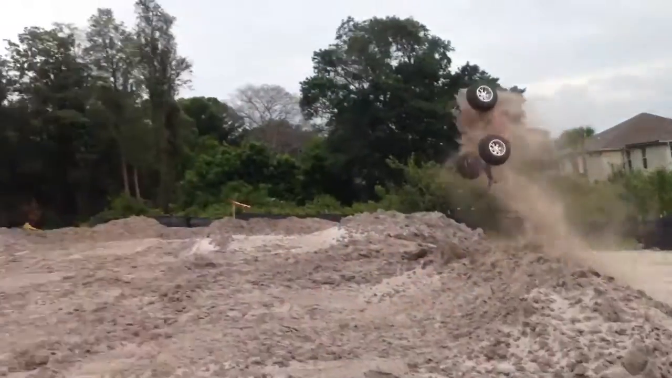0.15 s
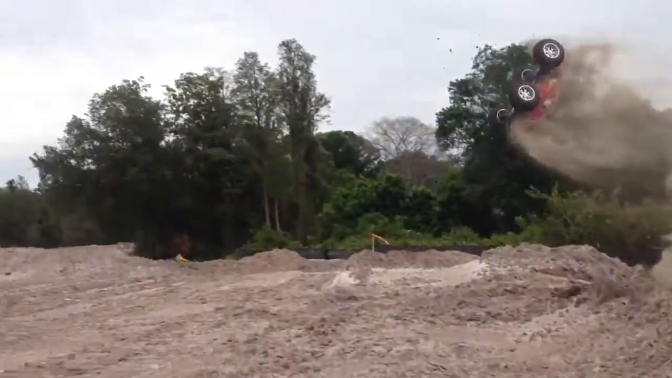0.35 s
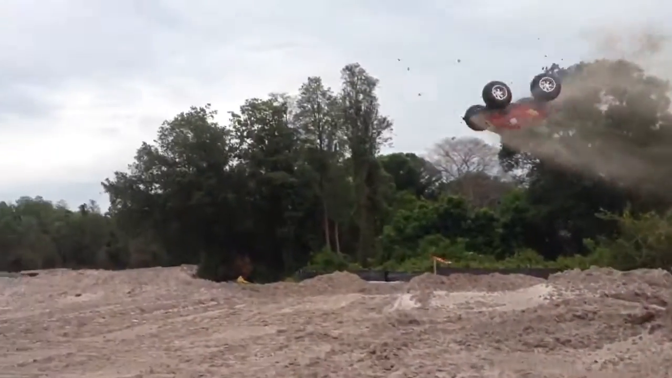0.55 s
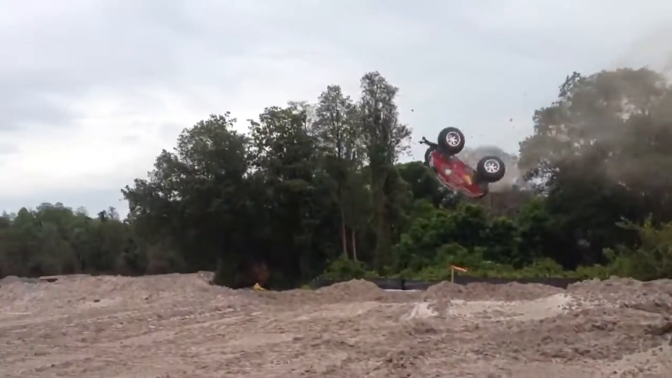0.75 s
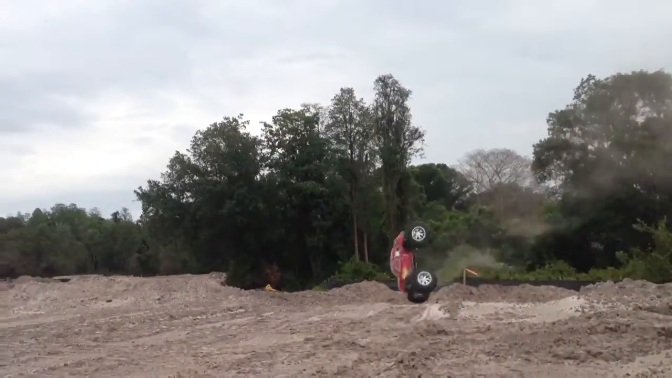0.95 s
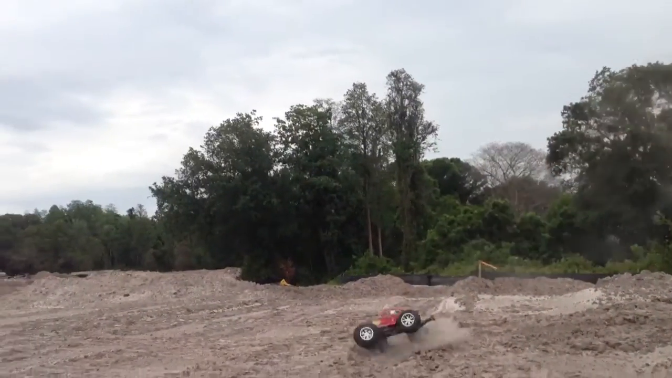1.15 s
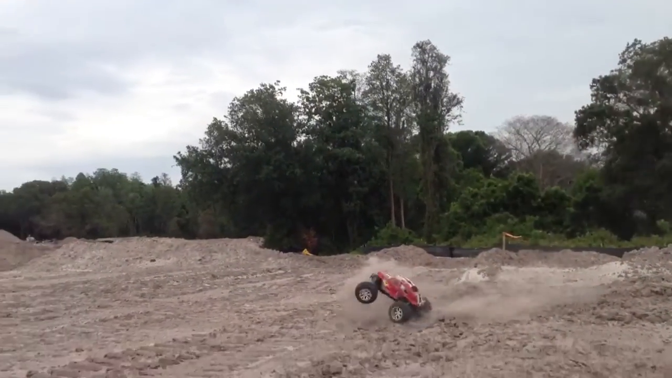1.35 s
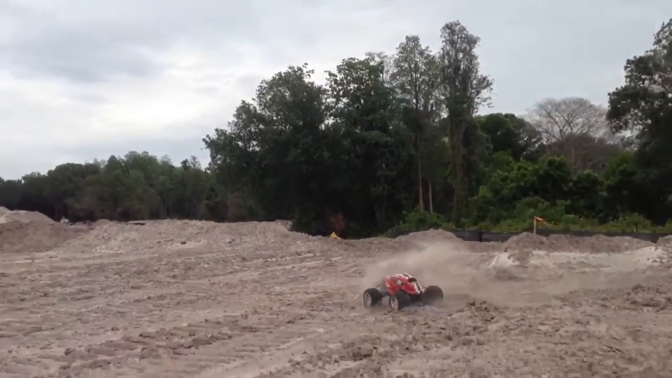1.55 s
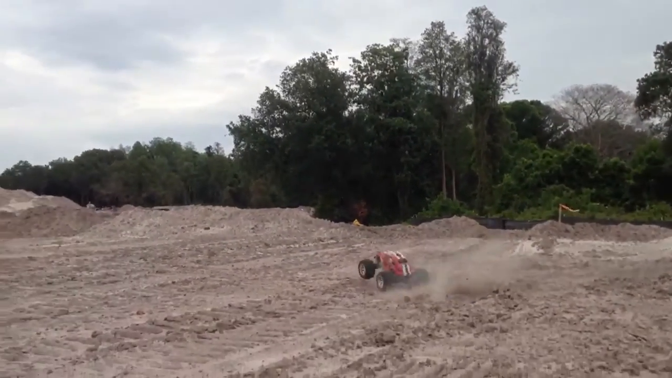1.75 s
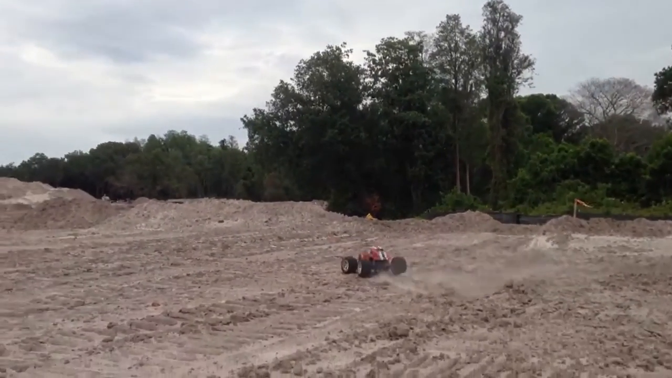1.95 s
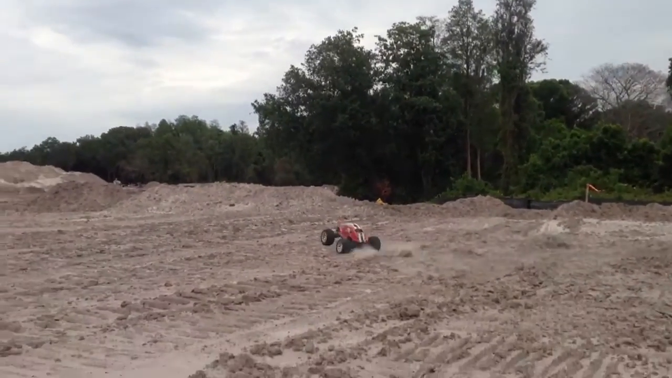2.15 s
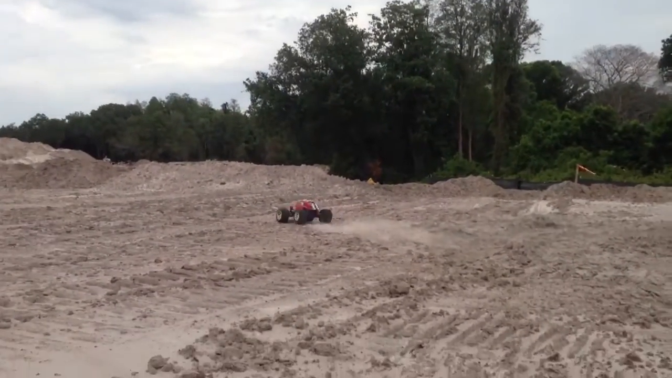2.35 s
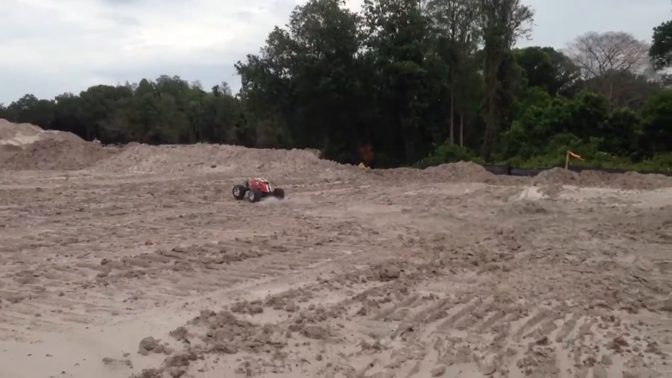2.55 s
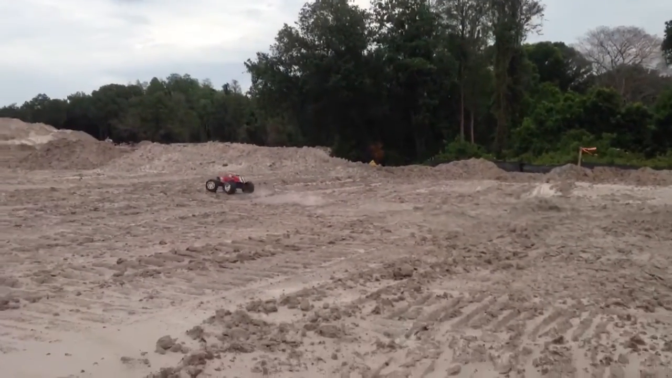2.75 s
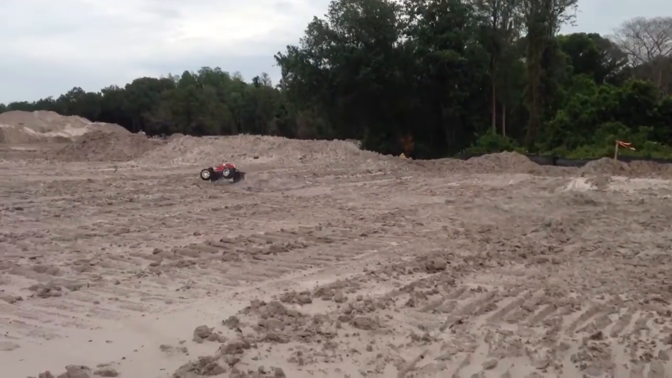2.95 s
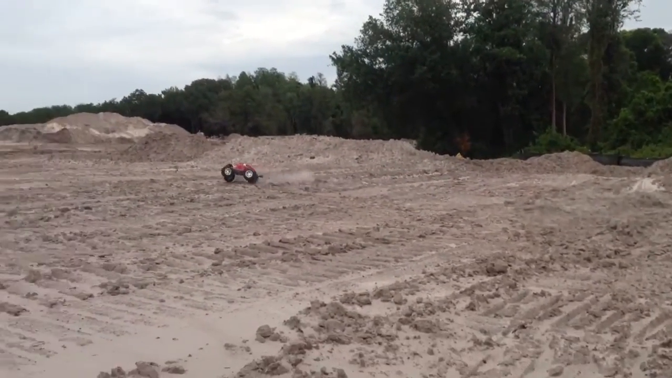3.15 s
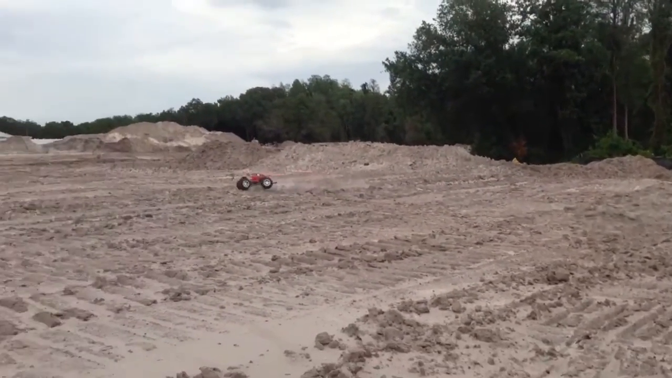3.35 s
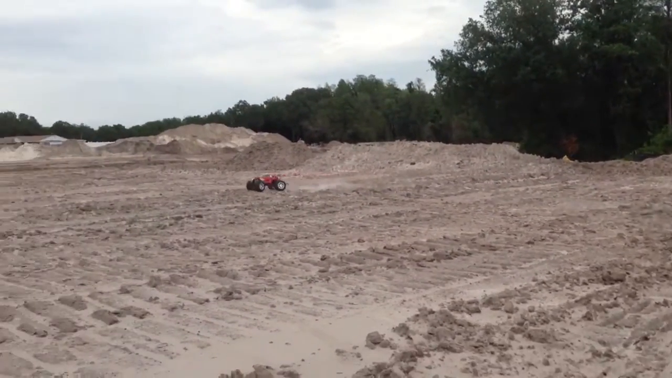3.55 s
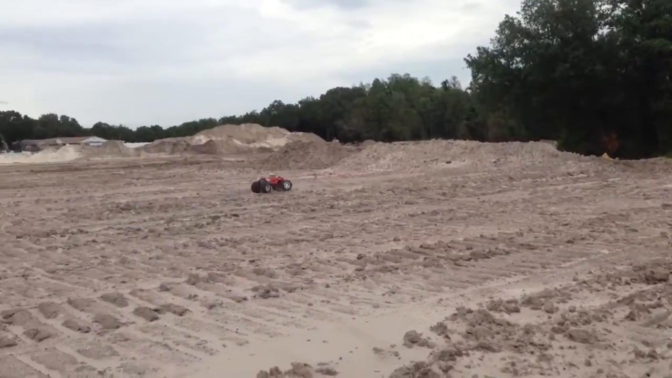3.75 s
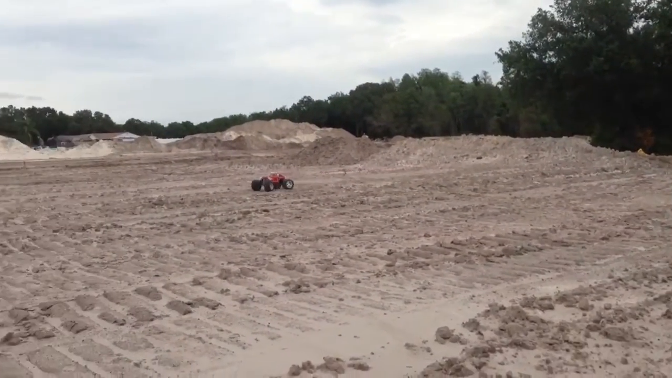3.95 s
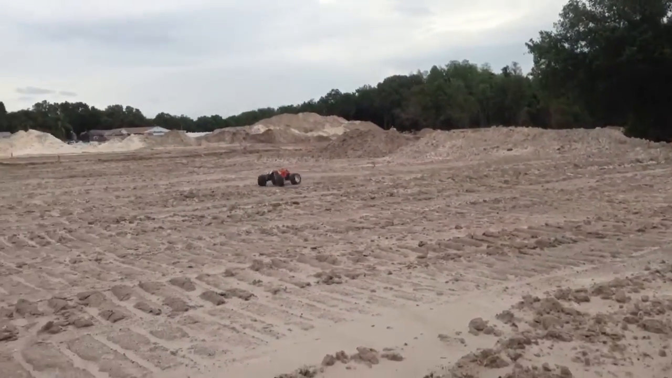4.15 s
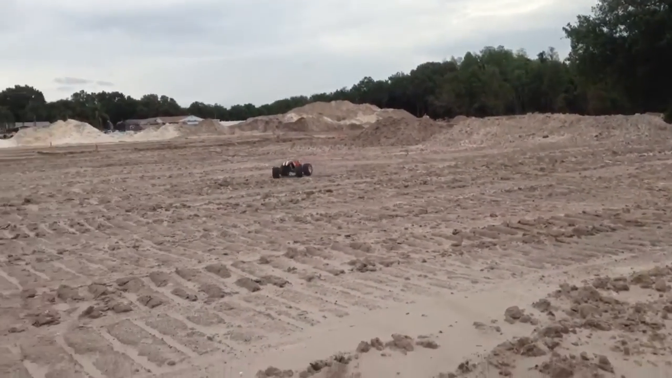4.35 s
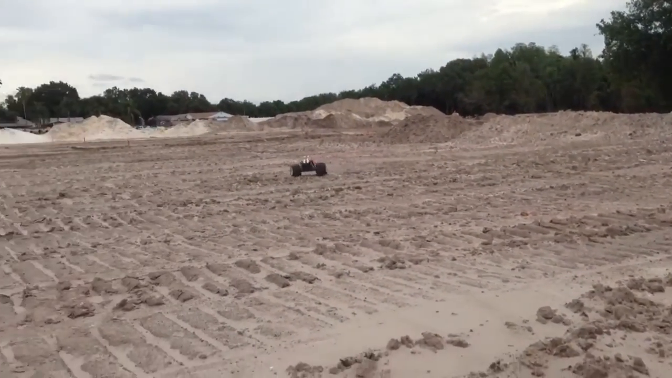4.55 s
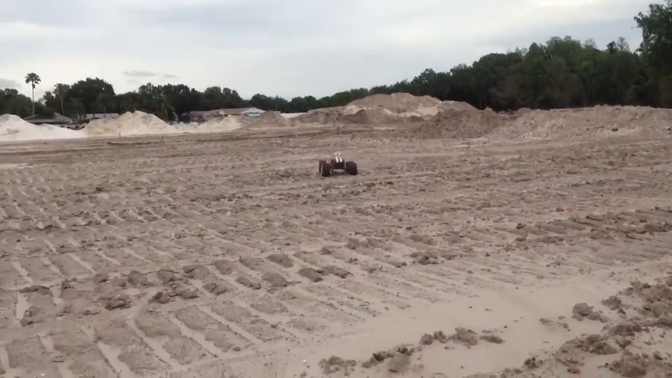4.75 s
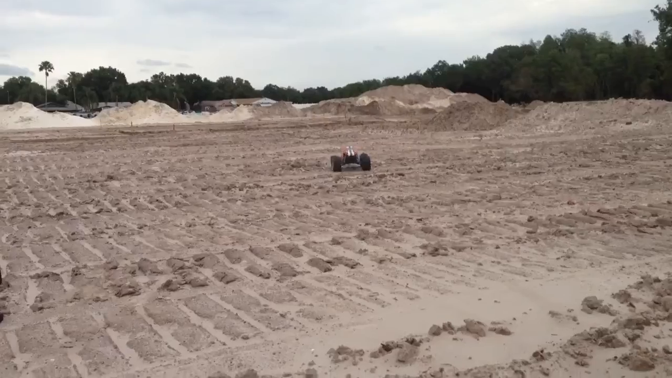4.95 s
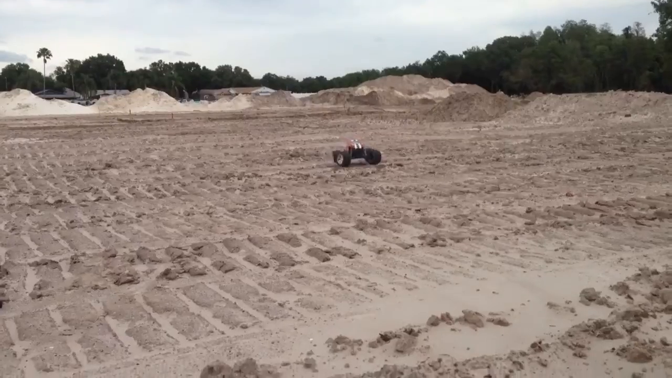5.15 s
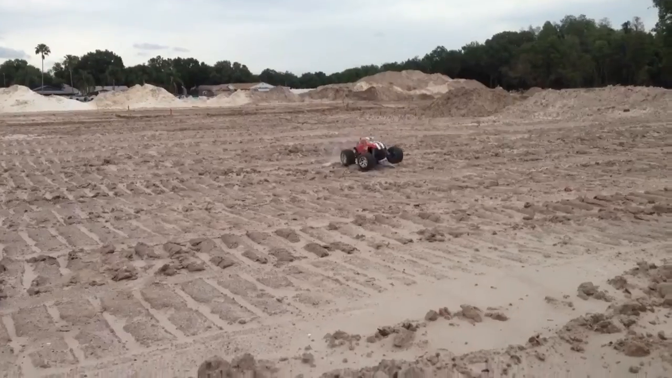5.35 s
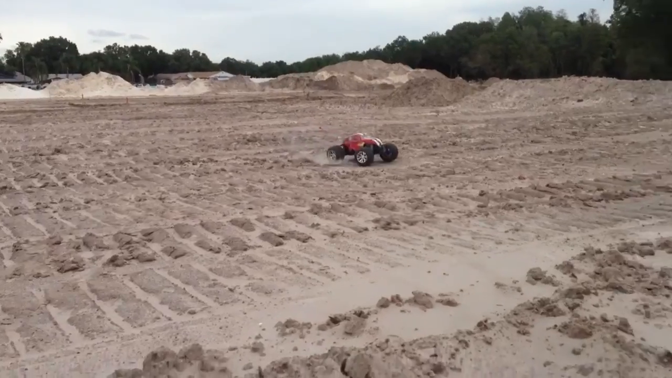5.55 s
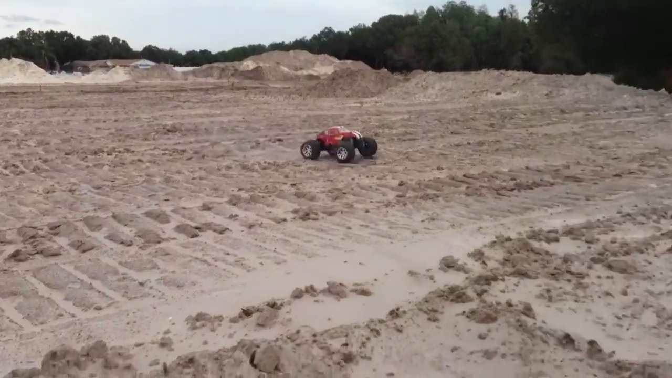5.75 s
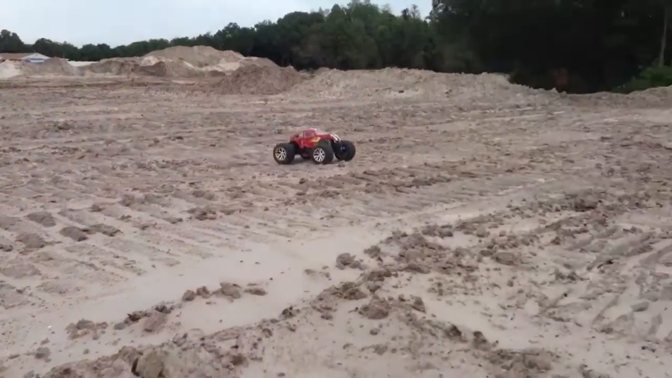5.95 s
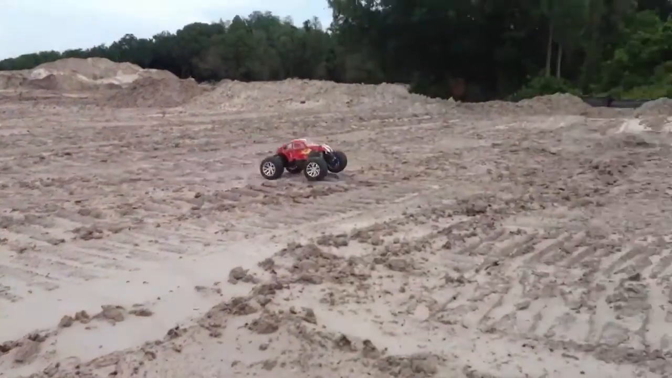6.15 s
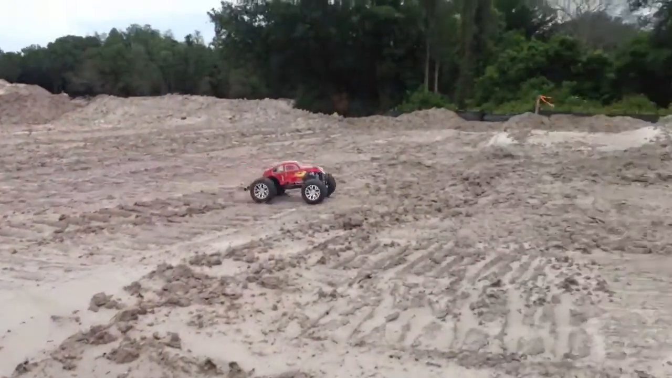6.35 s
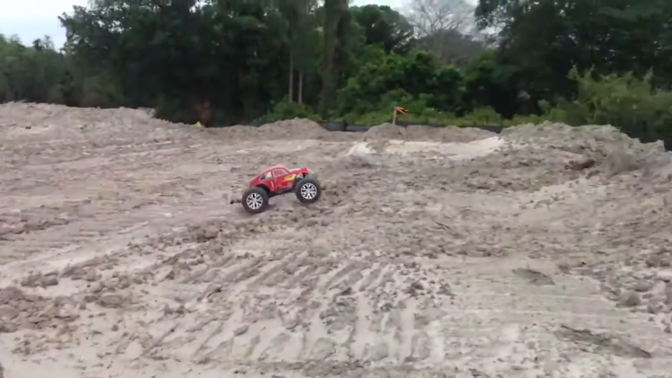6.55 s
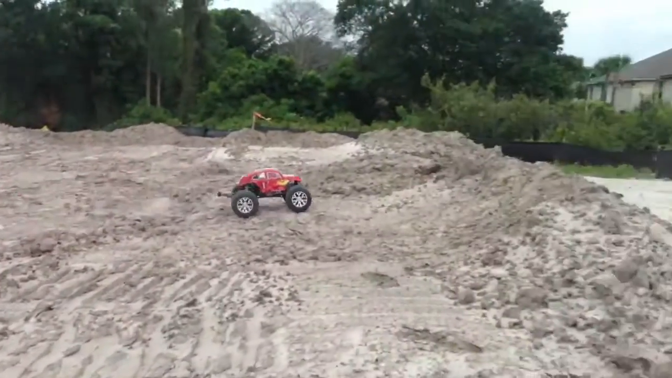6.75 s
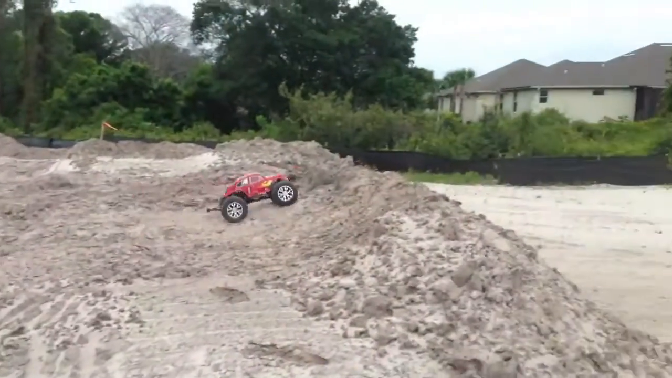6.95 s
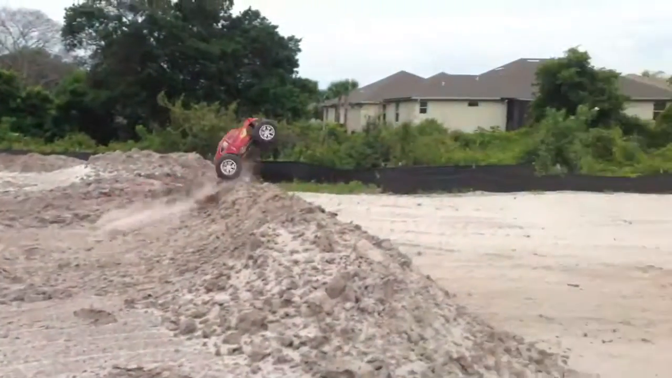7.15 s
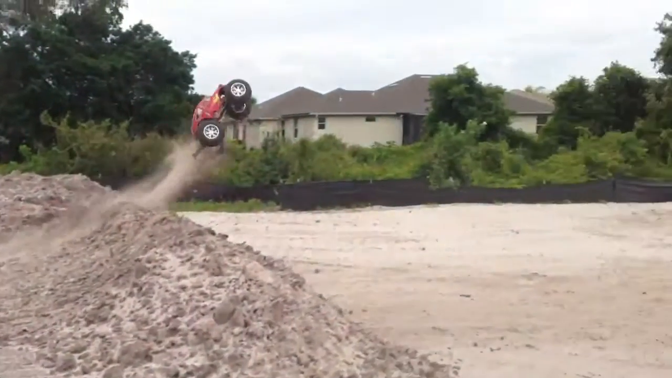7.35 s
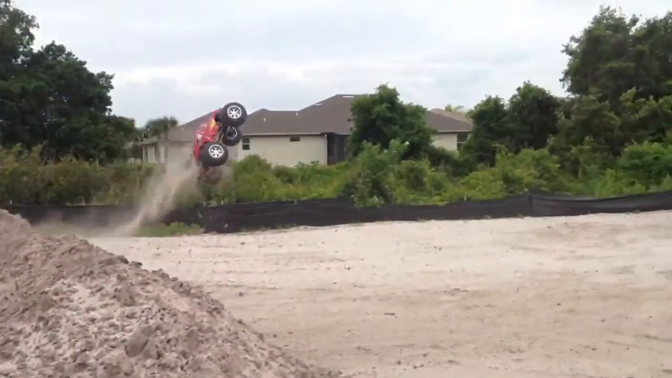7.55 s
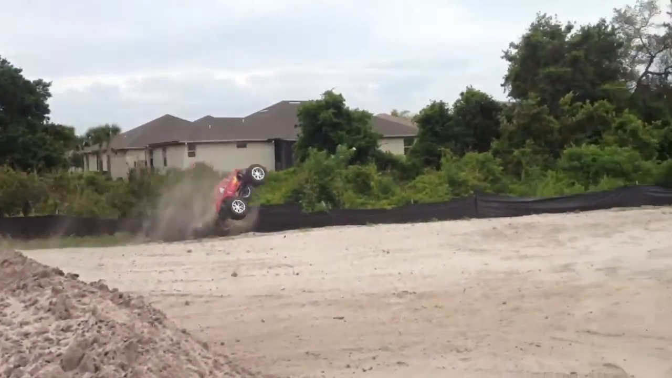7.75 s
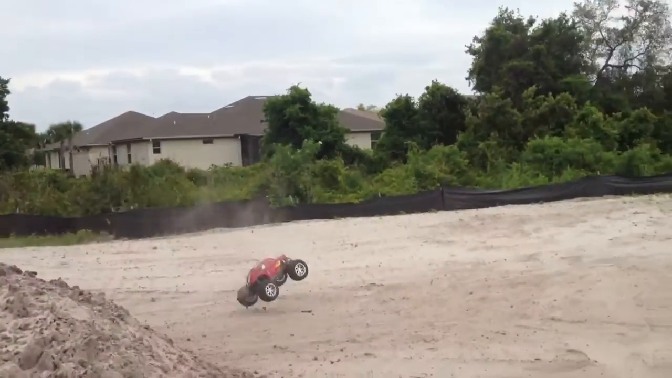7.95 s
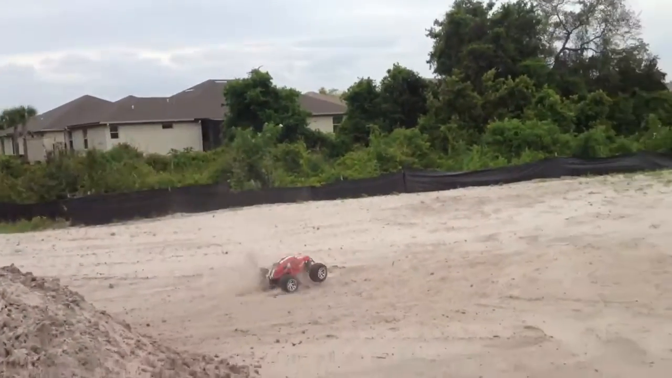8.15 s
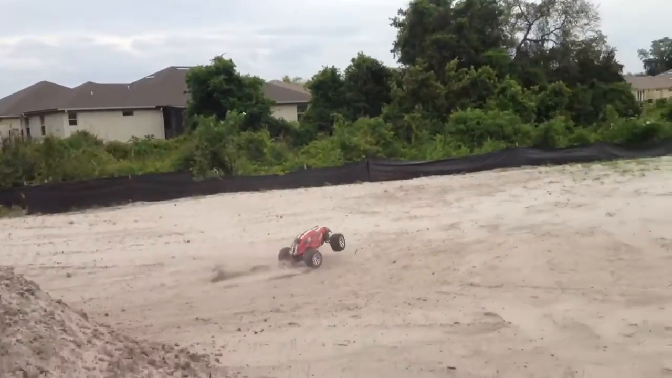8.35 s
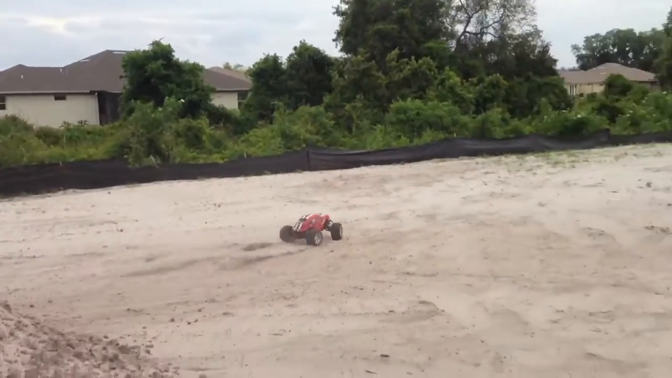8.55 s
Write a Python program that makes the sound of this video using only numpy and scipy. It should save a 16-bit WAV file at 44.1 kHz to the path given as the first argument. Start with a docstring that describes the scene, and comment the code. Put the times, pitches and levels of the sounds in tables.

```python
"""Radio-controlled truck on sand

An electric truck jumps a dirt mound, drives off in throttle bursts, returns and jumps again.
Meshing gear teeth whine and rasp, the chassis rings and the tyres churn the sand; landings clack and
thud, and clods fall. All is heard in mono, with the echo off the ground, over a distant rumble."""
import sys
import numpy as np
from scipy import signal
from scipy.fft import rfft, irfft
from scipy.io import wavfile
from scipy.ndimage import uniform_filter1d

SR = 44100
rng = np.random.default_rng(int(sys.argv[2]) if len(sys.argv) > 2 else 0)


def int16_out(signal):
    """Quantize to a 16-bit WAV file."""
    q = np.round(np.clip(np.atleast_2d(signal).T, -1, 1) * 32767)
    wavfile.write(sys.argv[1], SR, q.astype(np.int16))


N = 378819
T = np.arange(N) / SR
STEPS = T[::32]  # coarse time grid for slow controls


def undb(db):
    """Amplitude ratio of a level in decibels."""
    return 10 ** (np.asarray(db) / 20)


def unit(x):
    """Normalisation to rms 1."""
    return x / np.sqrt(np.mean(x ** 2))


def curves(rows):
    """Linear interpolation of each column against time, one value per sample."""
    times, *columns = np.transpose(rows)
    return [np.interp(T, np.sort(times), column) for column in columns]


def per_sample(control):
    """Linear interpolation of a slow control to the sample rate."""
    return np.interp(T, STEPS, control)


def settle(control, start, goal, time_s):
    """First-order relaxation of a slow control towards a goal, from start on."""
    gap = np.interp(start, STEPS, control) - goal
    decay = np.exp(-np.maximum(STEPS - start, 0) / time_s)
    return np.where(STEPS < start, control, goal + gap * decay)


def bell(t, centre, width):
    """Gaussian pulse, down to 1/e at one width from its centre."""
    return np.exp(-((t - centre) / width) ** 2)


def burst(start, rise_s, decay_s):
    """Impact envelope: exponential rise and decay."""
    age = np.maximum(T - start, 0)
    return (1 - np.exp(-age / rise_s)) * np.exp(-np.minimum(age / decay_s, 20))


def walk(rate):
    """Smooth random fluctuation with spread near 1, taking rate new values a second."""
    span = max(int(SR / rate), 2)
    held = np.repeat(rng.standard_normal(N // span + 1), span)
    return 1.2 * uniform_filter1d(held, span)[:N]


def grains(rate, spread_db):
    """Shot noise: tiny impacts of uneven size, on average rate a second."""
    impacts = (rng.random(N) < rate / SR) * rng.standard_normal(N)
    return unit(impacts * undb(spread_db * np.clip(rng.standard_normal(N), -2, 2)))


def colour(x, points, size=2048):
    """Minimum-phase filter through the given (f/Hz, gain/dB) points."""
    hz, db = np.transpose(points)
    bins = np.maximum(np.arange(size // 2 + 1) * SR / size, 1)
    gain = undb(np.interp(np.log(bins), np.log(hz), db))
    cepstrum = irfft(np.log(gain))
    cepstrum[1:size // 2] *= 2
    cepstrum[size // 2 + 1:] = 0
    return signal.fftconvolve(x, irfft(np.exp(rfft(cepstrum))))[:N]


def resonate(x, hz, width_hz):
    """Second-order resonance, gain 1 at its centre."""
    return signal.lfilter(*signal.iirpeak(hz, hz / width_hz, fs=SR), x)


def band(x, hz, width_hz):
    """Two equal resonances in cascade, for steeper skirts."""
    return resonate(resonate(x, hz, width_hz), hz, width_hz)


# Path from truck to listener: t/s, distance/m
RANGE = [(0, 3.6), (1.2, 6.3), (2, 8.54), (3, 14.1), (3.6, 20.5), (4.5, 14.3), (5.4, 7.63), (6.2, 5.45),
         (7, 2.44), (8, 7.65), (8.59, 7.73)]

def distance():
    """Length of the direct sound path in metres."""
    return curves(RANGE)[0]


# Jumps: take-off t/s, landing t/s
FLIGHTS = [(0.15, 1.15), (7.24, 8.05)]

def airborne():
    """Loss of ground contact: 1 in flight, 0 on the sand."""
    in_flight = sum((STEPS > up) & (STEPS < down) for up, down in FLIGHTS)
    return per_sample(uniform_filter1d(in_flight.astype(float), size=40))


# Throttle pulls: t/s, hold/s, rasp level/dB, swell over the hold/dB, goal tooth rate/Hz, torque (0-1),
# ring re rasp/dB, wheel load re rasp/dB
PULLS = [(-0.03, 0.089, -22.5, 13.5, 1393, 0.96, -5, -12), (0.066, 0.074, -11, 2, 1446, 0.84, -6.5, -26),
         (0.152, 0.27, -22, -7, 1631, 0.13, -0.5, -12.5),
         (0.432, 0.76, -26.5, 3.5, 1661, 0.02, -3.5, -15.5), (1.136, 0.046, -10, 0, 1653, 0.21, -5, -13.5),
         (1.548, 0.097, -19.5, 10, 825, 0.26, -25, -12.5), (1.644, .135, -14, 2, 1604, .9, -12, -11),
         (2.07, .17, -12.5, -5, 1540, .9, -19, -13), (2.49, .105, -15.5, 3, 1600, 0.9, -27, -12),
         (2.999, .086, -12, 7, 1270, 1, -12, -19), (3.087, 0.079, -11.5, -4, 1700, 0, -26, -15.5),
         (3.652, 0.17, -20, -2.5, 980, 0.1, -11, -12.5), (4.062, 0.33, -20, -0.5, 917, 0.01, -9.5, -15.5),
         (4.57, 0.52, -22, 0.5, 1031, 0, -7.5, -11.5), (5.102, .17, -19.5, -2.5, 1183, 0.2, -4, -14),
         (5.49, .43, -21.5, 3.5, 1110, 0, -14, -14), (5.91, 0.41, -19.5, -3.5, 1240, 0, -14, -14.5),
         (6.342, .5, -21.5, -13.5, 1455, 0.15, -13, -17.5), (7.025, .105, -18.5, 4, 1480, .8, -9, -11.5),
         (7.135, .03, -17.5, 0, 2300, 1, -9, -10.5), (7.165, .04, -18, 0, 1780, 1, -9, -10.5),
         (7.218, 0.4, -30.5, -25, 1388, 0, -2, -17), (7.645, 0.15, -22, 3, 1307, 0.03, -5, -11.5),
         (8.179, 0.15, -18, -7, 1252, 0.7, -15, -10.5), (8.335, 0.24, -19, 1, 1300, 0.1, -15.5, -13)]

def motor():
    """Inertia: pulls spin the gears up, then they coast. Gives tooth rate, torque and drive (0-1)."""
    entry_hz, coast_hz = 1594.6, 852.4
    hz = np.full(len(STEPS), entry_hz)
    torque, driven = np.zeros(len(STEPS)), np.ones(len(STEPS))
    for start, hold, _, _, goal_hz, push, _, _ in PULLS:
        hz = settle(hz, start, goal_hz, time_s=0.075)
        hz = settle(hz, start + hold, coast_hz, time_s=0.17)
        torque = settle(torque, start, push, time_s=0.025)
        torque = settle(torque, start + hold, 0, time_s=0.019)
        driven = settle(driven, start, 0.97, time_s=0.025)
        driven = settle(driven, start + hold, 0, time_s=0.086)
    return per_sample(snag(hz)), per_sample(np.clip(torque, 0, 1)), per_sample(driven)


# Tyres catching the ground: centre t/s, width/s, share of speed lost
SNAGS = [(.14, .03, .07), (1.182, .02, .25), (1.722, .018, .26), (2.08, .02, .08), (7.135, .011, .13),
         (7.221, .015, .22), (8.2, .03, .27), (8.59, .05, .18)]

def snag(tooth_hz):
    """Friction at the tyres drags the gears down for a moment."""
    for t, width, lost in SNAGS:
        tooth_hz = tooth_hz * (1 - lost * bell(STEPS, t, width))
    return tooth_hz


# Ruts, hops and landings: centre t/s, width/s, rasp level/dB, ring re rasp/dB, wheel load re rasp/dB
BUMPS = [(1.179, 0.022, -10, -5, -26), (1.209, 0.017, -11, 2.5, -15), (1.277, 0.037, -17, 2.5, -8),
         (1.351, 0.03, -23, -2.5, -13), (1.45, 0.055, -32, 3.5, -7), (1.839, 0.014, -19, -7, -9),
         (1.928, 0.034, -19.5, -4, -11), (2.054, 0.051, -18.5, -9, -15), (2.276, 0.054, -43, -20, -5),
         (2.353, 0.015, -18.5, -21, -9), (2.557, 0.023, -8, -30, -26), (2.715, 0.041, -25, -18, -6.5),
         (2.793, 0.013, -32, -18, -26), (2.849, 0.045, -26, -22, -19), (2.968, 0.022, -25.5, 0, -14),
         (3.074, 0.029, -9, -21, -15.5), (3.23, 0.011, -18.5, -23, -13), (3.362, 0.032, -19, -20, -9.5),
         (3.397, 0.012, -15, -14, -11.5), (3.895, 0.052, -27, -22, -26), (3.978, 0.025, -26, -12, -28),
         (4.435, 0.017, -19.5, -9, -12.5), (4.485, 0.03, -21.5, -9, -12), (4.538, 0.03, -20.5, -0.5, -15),
         (5.325, 0.062, -26.5, -20, -9), (5.394, 0.02, -19, -11, -12), (5.451, 0.033, -23.5, -13, -15),
         (5.509, 0.017, -24.5, -4.5, -12), (6.827, 0.017, -22, -28, -14), (6.945, 0.016, -25, -14, -21),
         (6.995, 0.018, -26, -13, -24), (7.21, .018, -18, -10, -12), (7.28, 0.018, -19, 4, -17),
         (7.469, 0.024, -24.5, -23, -25), (7.907, 0.016, -28, -4, -2.5), (8.042, 0.027, -25.5, -3.5, -31),
         (8.094, 0.017, -16, -21, -12)]

def excitation():
    """Rolling, pulls and bumps add in power and spread as 1/r. Gives rasp, ring and load gains."""
    def power(envelope, db, ring_db, load_db):
        """Power of each of the three layers, the square of its amplitude."""
        return np.outer(undb([db, db + ring_db, db + load_db]), envelope) ** 2
    attack_s, release_s = 0.015, 0.043
    total = power(np.ones(len(STEPS)), db=-32.5, ring_db=-11, load_db=-13)  # rolling freely
    for start, hold, db, swell_db, _, _, ring_db, load_db in PULLS:
        age = np.maximum(STEPS - start, 0)
        gate = (1 - np.exp(-age / attack_s)) * np.exp(-np.maximum(age - hold, 0) / release_s)
        swell = undb(swell_db * (np.minimum(age / hold, 1) - 0.5))
        total += power(gate * swell, db, ring_db, load_db)
    for t, width, db, ring_db, load_db in BUMPS:
        total += power(bell(STEPS, t, width) ** 2, db, ring_db, load_db)
    return [per_sample(np.sqrt(layer)) / distance() for layer in total]


def teeth(mesh_cycles, scatter_db, play):
    """Backlash: teeth click with uneven force, early or late by play (a share of their spacing)."""
    contacts = np.flatnonzero(np.diff(np.floor(mesh_cycles)) > 0)
    spacing = 1 / np.gradient(mesh_cycles)[contacts]
    force, slip = rng.standard_normal((2, N))[:, :len(contacts)]
    when = np.clip(np.round(contacts + play * spacing * slip), 0, N - 1).astype(int)
    return unit(np.bincount(when, undb(scatter_db * force) * np.sqrt(spacing), N))


def growl(mesh_cycles, torque):
    """Amplitude modulation: the loaded mesh tightens and loosens once per turn of the motor shaft."""
    return 1 + 0.45 * torque * np.sin(2 * np.pi * mesh_cycles / 4.2)


# Gearbox response: f/Hz, gain/dB
GEARBOX = [(1500, -53.5), (2700, -16.5), (3300, -16), (4300, -20), (5100, -12.5), (5600, -9), (6200, -6),
           (7100, -3), (7600, 2), (7950, 2.5), (8400, -8), (9200, -13.5), (10200, -20), (11200, -41.5),
           (13000, -39.5), (15500, -32.5)]

def gear_rasp(mesh_cycles, torque, chatter):
    """Impact excitation: teeth and grit strike the gearbox, which filters their clicks."""
    strikes = teeth(mesh_cycles, scatter_db=0.5, play=0.22) + 1.3 * grains(rate=9000, spread_db=0)
    return unit(colour(strikes * chatter * growl(mesh_cycles, torque), GEARBOX))


# Chassis and body resonances: f/Hz, nominal bandwidth/Hz, gain/dB
CHASSIS = [(2112, 183, 9.5), (2353, 190, 8.5), (2550, 380, 9.5), (3030, 83, -19), (4840, 2970, -0.5)]

def chassis(strikes):
    """Modal response: the plastic frame and shell ring in a few steep bands."""
    return unit(sum(undb(db) * band(strikes, hz, 1.28 * width) for hz, width, db in CHASSIS))


# Spectrum of disturbed sand: f/Hz, level/dB
SAND = [(60, -16), (150, -7), (300, -4.5), (480, -16), (660, 2.5), (800, -1), (1050, 5), (1600, 1.5),
        (2600, 2.5), (4000, -7), (6000, 3), (11000, -32.5)]

def sand(rate, spread_db):
    """Granular noise: many small collisions merge into a crunch."""
    return unit(colour(grains(rate, spread_db), SAND))


# Gear partials: multiple of the axle tooth rate (1.48 is the motor pinion), coasting level/dB,
# full-torque level/dB, airborne level/dB
WHINE = [(1, -9.5, -8, -10), (1.48, -15, -4.5, 1), (2, -7, -12, -23), (2.48, -18, -14, -26),
         (2.97, -9, -6.5, -12), (4, -15, -13, -25), (4.44, -27, -9, -12)]
# Whine standing out as the tyres grip: centre t/s, width/s, gain/dB
BITES = [(.047, .018, 8), (1.18, .02, 5), (1.695, .018, 4), (1.765, .025, 1), (2.16, .04, 3),
         (2.61, .04, 3), (3.073, .026, 4.5), (5.99, .04, 3), (7.18, .045, 6), (8.28, .05, 4)]
# Radiation response of the body: f/Hz, gain/dB
RADIATION = [(900, -3), (1350, 1), (1900, 2), (2150, -1), (2400, 2), (2900, 1), (3250, -3), (3700, -1),
             (4200, 0), (4600, -5), (5100, 2), (7000, 2)]

def gear_whine(mesh_cycles, torque, driven, air):
    """Periodic meshing gives tones, blurred by backlash, firmer under load or racing in the air."""
    tones = np.zeros(N)
    racing = air * np.interp(np.gradient(mesh_cycles) * SR, [1350, 1580], [0, 1])
    rough = 1 - 0.7 * racing
    blur = rough * (0.32 - 0.2 * torque)  # noisy share of each tone's power
    # overtones dominate close by, low tones far off
    db_per_octave = (0.6 + 0.9 * np.maximum(torque, racing)) * (9 - np.minimum(distance(), 10))
    for multiple, coast_db, full_db, air_db in WHINE:
        sidebands = walk(75 * multiple) + 1j * walk(75 * multiple)
        flutter = np.sqrt(1 - blur) + np.sqrt(blur / 2) * sidebands
        flutter_db = 3 * rough * walk(45)
        tilt_db = db_per_octave * np.log2(multiple / 1.7)
        db = (1 - racing) * (coast_db + torque * (full_db - coast_db)) + racing * air_db
        tone = np.sqrt(2) * np.imag(flutter * np.exp(2j * np.pi * multiple * mesh_cycles))
        tones += undb(db + flutter_db + tilt_db) * tone
    throb = 1 + 0.4 * rough * np.sin(2 * np.pi * mesh_cycles / 11)  # once per shaft turn
    bite_db = sum(db * bell(T, t, width) for t, width, db in BITES)
    drive_db = -9 + 6 * driven  # fainter when freewheeling
    return colour(tones * throb * growl(mesh_cycles, torque) * undb(bite_db + drive_db), RADIATION)


def drivetrain(rasp_gain, ring_gain, load_gain):
    """One gear mesh excites rasp, ring and whine; wheel load brings up whine and churning sand."""
    tooth_hz, torque, driven = motor()
    air = airborne()
    jolt = 1 - 0.7 * air
    wobble = jolt * (0.007 * walk(60) + 0.009 * walk(18))
    mesh_cycles = np.cumsum(tooth_hz * (1 + wobble)) / SR
    chatter = unit(undb(1.1 * walk(450)))  # slack in the shafts
    shake = unit(undb(1.47 * jolt * walk(60)))  # rough ground
    rasp = gear_rasp(mesh_cycles, torque, chatter)
    clicks = teeth(mesh_cycles, scatter_db=1.0, play=0.08)
    grit = grains(rate=6800, spread_db=2.5) * chatter
    ring = chassis(0.28 * clicks + grit) * undb(2.4 * jolt * walk(40))
    churn = sand(rate=8800, spread_db=1.5) * undb(2 * walk(35) - 4 - 6.5 * torque - 2 * air)
    wheels = gear_whine(mesh_cycles, torque, driven, air) + churn
    return shake * (undb(-3.5) * rasp_gain * rasp + undb(-7.5) * ring_gain * ring + load_gain * wheels)


# Modes of the loose shell: f/Hz, bandwidth/Hz, gain/dB
SHELL = [(1853, 250, -5), (2630, 280, 0), (3660, 400, -4)]

def shell_rattle(load_gain):
    """Intermittent contact: over the ruts the loose shell taps its posts in short fits."""
    fits = unit(undb(5 * walk(32)))
    taps = grains(rate=2500, spread_db=0.5)
    shell = unit(sum(undb(db) * resonate(taps, hz, width) for hz, width, db in SHELL))
    return undb(-14) * (1 - airborne()) * load_gain * fits * shell


def tyres(load_gain):
    """Forced resonance: while on the ground, hollow tyres drum on the ruts and the shell hums along."""
    ruts = rng.standard_normal(N)
    drum = undb(-31.5) * unit(band(ruts, hz=156, width_hz=89))
    hum = undb(-37) * unit(band(ruts, hz=646, width_hz=72))
    return (1 - airborne()) * np.sqrt(load_gain / distance()) * (drum + hum)


# Ambient noise spectrum: f/Hz, level/dB
AMBIENT = [(25, -40), (60, -21.5), (120, -2.5), (190, -3), (300, -13), (480, -17.5), (700, -15.5),
           (1500, -21), (3500, -27), (9000, -24.5), (15000, -26.5)]

def background():
    """Filtered noise: far traffic rumbles under a thin steady hiss."""
    ambient = unit(colour(rng.standard_normal(N), AMBIENT))
    rumble = unit(band(rng.standard_normal(N), hz=138, width_hz=108))
    return undb(-62) * ambient + undb(-67 + 2.6 * walk(6)) * rumble


# Squeals of frame and gearbox: centre t/s, width/s, level/dB, f/Hz
SQUEAKS = [(0.047, 0.012, -38, 6330), (0.077, 0.013, -22, 7920), (0.118, 0.022, -30, 6250),
           (0.136, 0.027, -32, 2087), (1.184, 0.0043, -29.5, 1974), (1.216, 0.015, -32, 2410),
           (3.03, 0.016, -45, 2770), (3.075, 0.013, -33, 6700), (5.141, 0.033, -46, 2290),
           (5.223, 0.025, -46, 2290), (5.63, 0.013, -43, 2303), (5.993, 0.026, -39, 2413),
           (6.071, 0.011, -43, 2366), (6.106, 0.012, -40, 2517), (7.109, 0.012, -37, 2020),
           (7.18, 0.022, -42, 2500), (7.214, 0.012, -35, 2100), (7.288, 0.0087, -34, 2560),
           (7.325, 0.012, -42, 2000), (7.366, 0.012, -42, 2074), (7.461, 0.0079, -42.5, 2092),
           (7.477, 0.0086, -39.5, 2045)]

def squeaks():
    """Resonance: short wavering tones swell and die, as when a gear tone catches a mode of the frame."""
    out = np.zeros(N)
    waver_cycles = 0.14 * walk(330)
    for t, width, db, hz in SQUEAKS:
        near = np.abs(T - t) < 3 * width
        tone = np.sin(2 * np.pi * (hz * T[near] + waver_cycles[near]))
        out[near] += undb(db) * bell(T[near], t, width) * tone
    return out * undb(2 * walk(120))


# Knocks of suspension and drive shafts: t/s, level/dB, relative chassis ring/dB
CLACKS = [(0.071, -12, -28), (0.128, -26, -8), (1.169, -13.5, -13), (1.1855, -28, -8), (1.563, -26, -29),
          (1.9587, -28, -18), (2.013, -33, -9), (2.461, -34, -28), (2.784, -40, -20), (2.955, -38, -8),
          (3.063, -20.5, -24), (3.157, -23.5, -14), (3.622, -36.5, -14), (6.9379, -25, -29),
          (7.206, -19, -6), (7.8888, -32, -11), (8.0319, -32, -12), (8.0678, -29, -26), (8.1924, -28, -20)]

def clacks():
    """Transient excitation: each knock rattles loose parts against gearbox and chassis."""
    out = np.zeros(N)
    bright = unit(colour(grains(rate=8400, spread_db=2), GEARBOX))
    dull = chassis(grains(rate=4000, spread_db=6))
    for t, db, ring_db in CLACKS:
        out += undb(db - 9) * burst(t, rise_s=0.00068, decay_s=0.0098) * (bright + undb(ring_db) * dull)
    return out


# Clods and wheels hitting the ground: t/s, level/dB, f/Hz
THUDS = [(0.714, -37, 243), (1.162, -31.5, 198), (1.229, -38.5, 172), (1.344, -38, 190), (1.391, -43, 174),
         (1.416, -41, 180), (1.458, -45, 195), (1.497, -41.5, 219.5), (8.086, -40, 126),
         (8.102, -35, 128.7), (8.132, -37, 143.6)]

def thuds():
    """Heavy damping: a soft blow on packed sand dies within a few cycles."""
    out = np.zeros(N)
    puff = unit(band(rng.standard_normal(N), hz=270, width_hz=450))
    for t, db, hz in THUDS:
        tone = np.sin(2 * np.pi * hz * (T - t))
        out += undb(db + 4) * burst(t, rise_s=0.0048, decay_s=1.38 / hz) * (tone + 0.24 * puff)
    return out


# Tyres and skid plate landing: t/s, level/dB
SMACKS = [(1.165, -33), (1.206, -39), (8.059, -45.5), (8.097, -39)]

def smacks():
    """Granular impact: packed sand crunches under each landing blow."""
    blows = sum(undb(db) * burst(t, rise_s=0.0015, decay_s=0.016) for t, db in SMACKS)
    return blows * sand(rate=2600, spread_db=2.5)


# Top treble, strongest as the truck faces the listener: t/s, gain/dB
FACING = [(0, 7.5), (1.1, 0.5), (2.5, 6.5), (4.2, 6.5), (5.0, 4.5), (5.9, 11.5), (6.7, 9.5), (7.2, 11),
          (7.8, 13.5), (8.5, 9)]

def beaming(x):
    """Directivity: short wavelengths beam forwards, so the treble follows the truck's heading."""
    facing_db, = curves(FACING)
    return x + (undb(facing_db) - 1) * band(x, hz=10670, width_hz=4240)


def rut_echo(x):
    """Comb filtering: a reflection off nearby ruts shifts in delay as the truck bounces along."""
    lag_s = 0.000678 * undb(2.55 * walk(4))
    return x + 0.17 * np.interp(T - lag_s, T, x)


# Ground reflection, strongest midway through the truck's return: t/s, echo-to-direct amplitude ratio
GROUND_REFLECTION = [(3.6, 0.047), (4.4, 0.24), (5.4, 0.35), (6.5, 0.022), (7.1, 0)]

def ground_echo(x):
    """Destructive interference: the reflection off flat sand hollows out the upper middle."""
    echo, = curves(GROUND_REFLECTION)
    lag_s = 0.00012
    return (x + echo * np.interp(T - lag_s, T, x)) / (1 + echo)


def scene():
    """Superposition: all sources add at one point, the same in both channels."""
    rasp_gain, ring_gain, load_gain = excitation()
    running = drivetrain(rasp_gain, ring_gain, load_gain) + shell_rattle(load_gain)
    truck = running + clacks() + smacks() + squeaks()
    mono = ground_echo(rut_echo(beaming(truck))) + tyres(load_gain) + thuds() + background()
    return np.array([mono, mono])


def record(dry):
    """Band limiting: a steep elliptic low-pass removes the highest treble."""
    cutoff_hz = 15200
    return signal.sosfilt(signal.ellip(10, 0.2, 70, cutoff_hz, fs=SR, output="sos"), dry)


dry = scene()
out = record(dry)
int16_out(out)
```